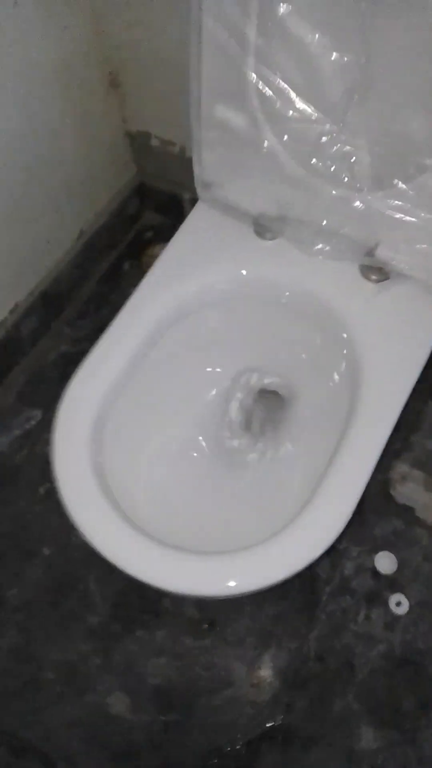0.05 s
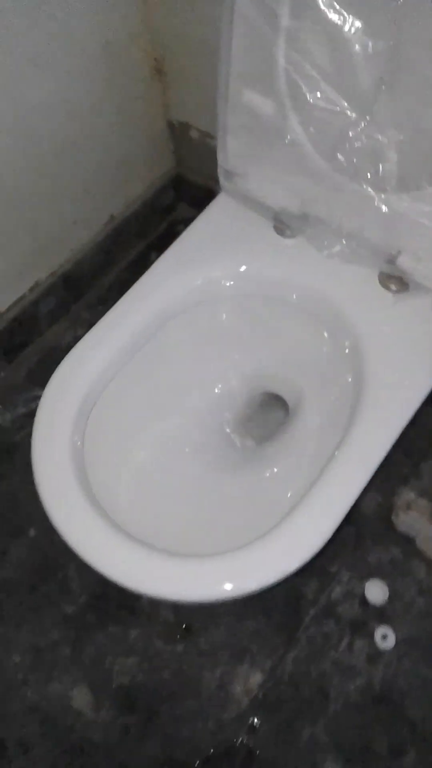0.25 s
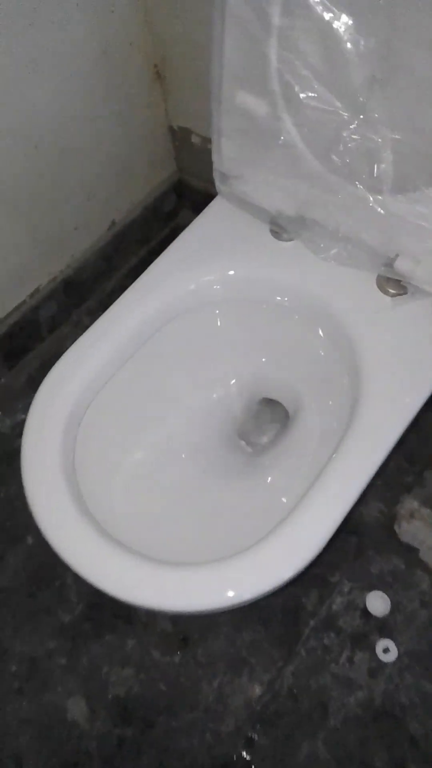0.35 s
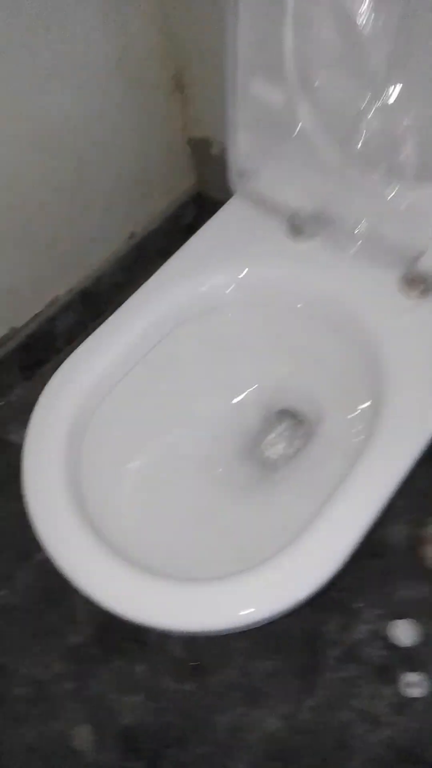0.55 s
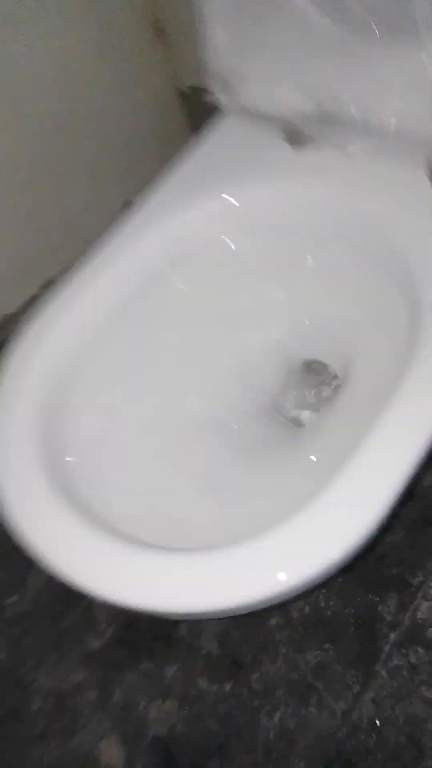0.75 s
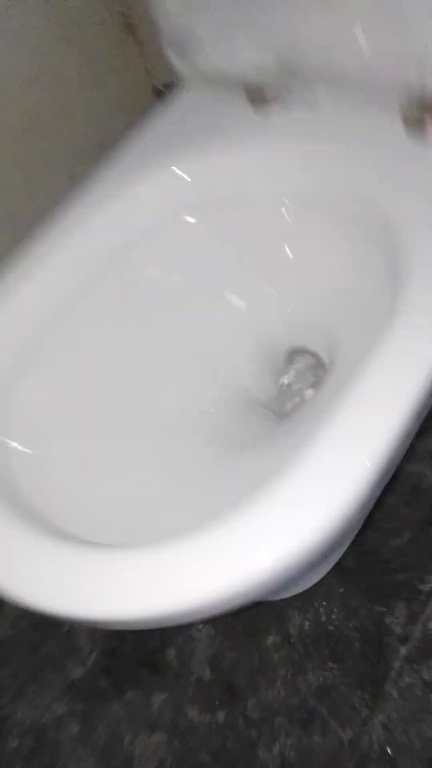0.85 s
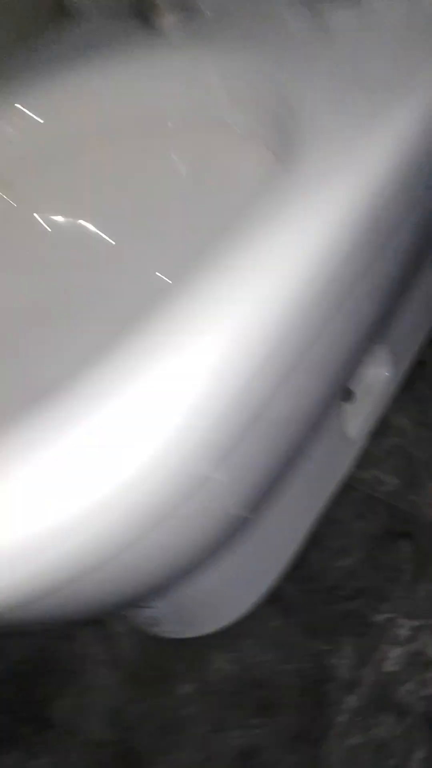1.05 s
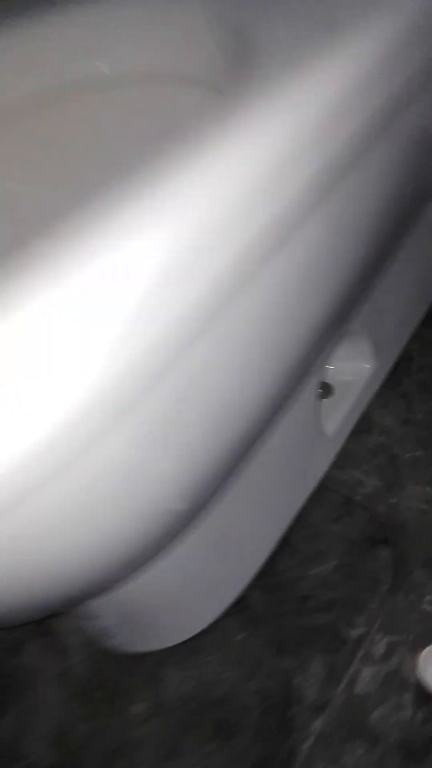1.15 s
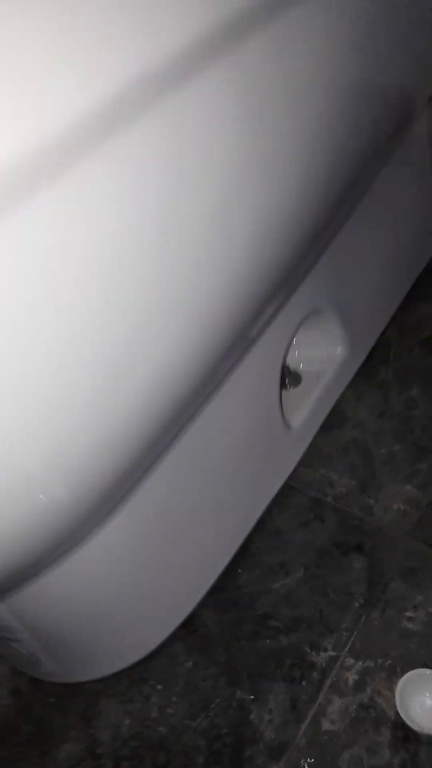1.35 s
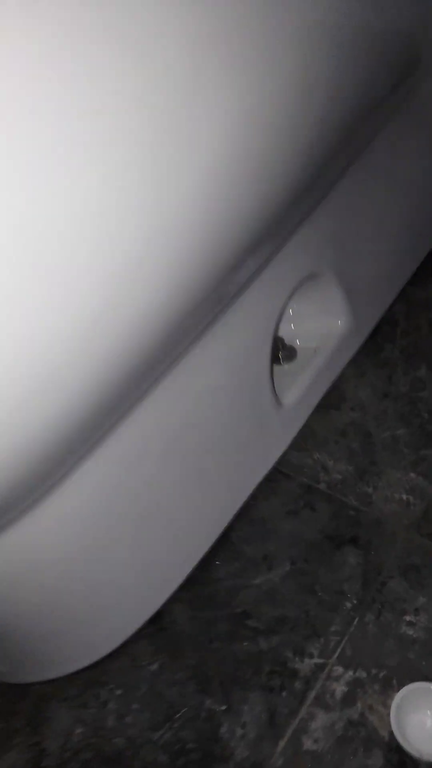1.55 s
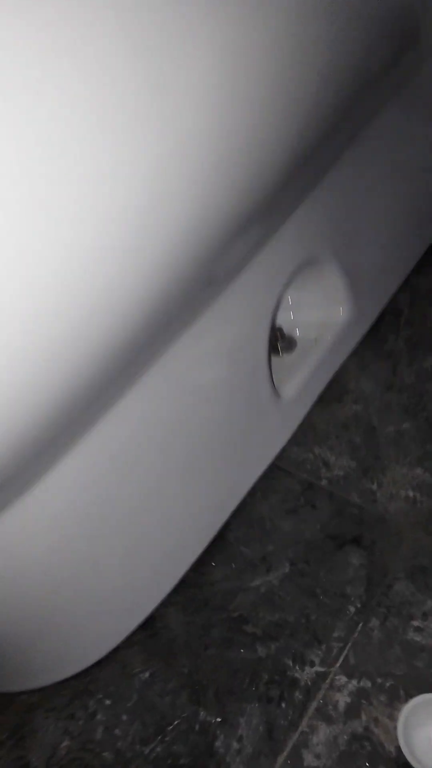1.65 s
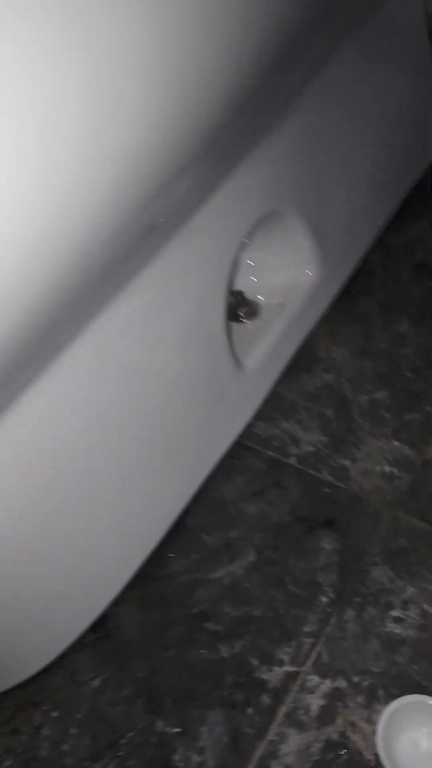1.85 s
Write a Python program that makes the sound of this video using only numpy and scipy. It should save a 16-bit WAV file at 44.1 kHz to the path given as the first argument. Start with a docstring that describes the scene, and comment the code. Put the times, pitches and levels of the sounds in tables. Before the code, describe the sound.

Close handheld microphone in a small echoing bathroom: the tail of a water surge, a loud bucket clatter with scrape, ringing decay, sparse quiet ticks, a soft shoe scuff, and a dull footfall near the end.

```python
"""Water sloshes in a ceramic toilet bowl in a small tiled room: grains of noise coloured by the bowl.
A hard hollow knock, probably the bucket set down, is clatter over decaying modes; its rim scrapes.
Water trickles as sparse grains through resonances, and drips and ticks are short noise strikes.
Clothing rustles close by in bright grains; a shoe slides with a rising hollow note, and steps ring.
Decaying reflections make the room, over a low background noise."""
import sys
import numpy as np
from scipy import signal
from scipy.io import wavfile

SR = 44100
rng = np.random.default_rng(int(sys.argv[2]) if len(sys.argv) > 2 else 0)


def waveform_to_disk(signal):
    """Save audio, clipped to [-1, 1], as 16-bit WAV at the path in sys.argv[1]."""
    frames = np.transpose(np.atleast_2d(signal))
    scaled = np.clip(frames, -1, 1) * 32767
    samples = np.round(scaled).astype(np.int16)
    wavfile.write(sys.argv[1], SR, samples)


N = 83790
T = np.arange(N) / SR  # time in seconds


# Surges of water in the bowl. Each row: start, rise, hold and fall to -60 dB in seconds, level in dB.
SLOSHES = [(0.0, .03, 0.035, .1, -54.5), (.046, 0.041, .02, 0.16, -32)]
# Spectrum of the hollow bowl. Each row: frequency in Hz, relative density in dB per Hz.
SLOSH_SPECTRUM = [(60, -41), (160, -30.5), (205, -9.5), (310, -10.5), (420, -5), (560, -21.5), (700, -13.5),
                  (900, -0.5), (1400, 2), (1800, -9), (2400, -7), (2900, -26), (3500, -25), (5700, -39.5),
                  (15000, -51)]


def slosh():
    """Superposition: many droplet impacts, filtered by the bowl, merge into a surge."""
    return in_room(grain_bursts(SLOSHES, 2500, SLOSH_SPECTRUM), wet_db=-4.5)


# Flow of water down the glaze. Each row: time in seconds, level in dB.
TRICKLE_LEVEL = [(0, -59.5), (.2, -63.5), (.55, -62), (.73, -54), (.82, -60.5), (.92, -62), (1.05, -64),
                 (1.13, -67.5), (1.25, -66.5), (1.6, -67), (1.72, -79.5), (1.9, -76)]
# Spectrum of the trickle. Each row: frequency in Hz, relative density in dB per Hz.
TRICKLE_SPECTRUM = [(300, -10), (800, -7), (1400, -1), (2200, -4), (3700, -5), (6000, -7), (8000, -3),
                    (11000, 4), (15500, -8)]
# Small air pockets that the trickle excites. Each row: frequency in Hz, width in Hz, gain in dB.
AIR_POCKETS = [(2850, 150, -17.5), (4555, 160, -18.5)]


def trickle():
    """Forced resonance: sparse droplet impacts excite small air pockets."""
    drops = grains(1300) * level(TRICKLE_LEVEL)
    return colour(drops, TRICKLE_SPECTRUM) + resonant(drops, AIR_POCKETS)


def water():
    """Superposition: the slosh and the thin trickle add, each with its own room sound."""
    flow = trickle()
    return slosh() + in_room(flow, wet_db=-6.5)


# Blows of the bucket. Each row: time in seconds, clatter level in dB,
# clatter fall to -60 dB in seconds, ring level in dB.
KNOCKS = [(.221, -13.5, 0.049, -21), (0.224, -10.5, 0.0387, -43), (.237, -19, .04, -50),
          (.284, -22.5, 0.1513, -42), (.38, -26, 0.0534, -38.5), (.509, -34.5, 0.0555, -49.5)]
# Spectrum of the clatter. Each row: frequency in Hz, relative density in dB per Hz.
KNOCK_SPECTRUM = [(40, -38.5), (150, -35.5), (200, -9.5), (255, -13.5), (310, -4.5), (370, -3.5), (445, -2),
                  (520, -12), (700, -12.5), (860, 3), (1020, -4.5), (1400, -2), (1800, -6.5), (2400, -6),
                  (2950, -23), (6000, -30.5), (10000, -28), (15000, -42)]
# Modes of bucket and room together. Each row: frequency in Hz, relative level in dB, T60 in seconds.
BUCKET_MODES = [(209.4, -12.5, .9), (304.4, -8, 0.92), (415.4, -6.5, .85), (435.5, -2, 1.12),
                (787, -13, .9), (868, -4, .7), (925, -7, .68), (918, -9, .48), (1150, -8, .45),
                (1317, -9, .48), (1333, -7.5, .45), (1460, -9.5, .47), (1665, -8, .36), (2235, -8, 0.3)]


def bucket_knock():
    """Impact excitation: each blow is a short noise clatter that sets decaying modes ringing."""
    blows = sum(burst(start, 0.0009, 0.0016, fall, db) for start, db, fall, _ in KNOCKS)
    ring = sum(ringing(start, ring_db, BUCKET_MODES) for start, _, _, ring_db in KNOCKS)
    clatter = colour(blows * rng.choice([-1., 1.], N), KNOCK_SPECTRUM)
    return in_room(clatter, wet_db=-1.4) + ring  # the modes already include the room


# Scrapes of the rim. Each row: start, rise, hold and fall to -60 dB in seconds, level in dB.
SCRAPES = [(.378, 0.00056, 0.01, 0.096, -20.5)]
# Spectrum of the scrape. Each row: frequency in Hz, relative density in dB per Hz.
SCRAPE_SPECTRUM = [(200, -13), (800, 5.5), (1500, 2), (2800, -0.5), (4200, -1), (6500, -10), (10000, -7),
                   (15000, -26.5)]


def rim_scrape():
    """Dry friction: the bucket's rim scrapes as a dense train of tiny impacts."""
    return in_room(grain_bursts(SCRAPES, 9000, SCRAPE_SPECTRUM), wet_db=-12.5)


# Drips and small ticks. Each row: time in seconds, level in dB.
TICKS = [(.082, -44), (.572, -59), (0.659, -43.5), (.729, -46), (0.906, -47.5), (0.9751, -41.5),
         (.985, -47), (1.176, -46.5), (1.358, -41), (1.777, -42), (1.892, -50)]
# Spectrum of a tick. Each row: frequency in Hz, relative density in dB per Hz.
TICK_SPECTRUM = [(200, -14), (700, -7), (2200, -2), (4500, -5.5), (7000, -7), (10500, 5), (15500, -4.5)]


def drips_and_ticks():
    """Transient excitation: each strike is a very short burst of broadband noise."""
    strikes = sum(burst(start, .0003, 0.00038, 0.021, db) for start, db in TICKS)
    return in_room(colour(strikes * rng.standard_normal(N), TICK_SPECTRUM), wet_db=-4.5)


# Crisp close rustles. Each row: start, rise, hold and fall to -60 dB in seconds, level in dB.
RUSTLES = [(.082, 0.0014, .003, .14, -52), (.22, 0.00079, 0.0029, 0.016, -23),
           (.278, 0.0086, .027, 0.061, -23.5), (.381, .014, 0.0099, .02, -21), (.41, 0.02, .022, .02, -30),
           (.45, .01, 0.017, .18, -50), (.585, .002, .008, .015, -44), (.99, 0.044, 0.022, .05, -54),
           (1.355, 0.0024, 0.0072, .03, -42), (1.792, .005, .022, 0.21, -44)]
# Spectrum of the cloth. Each row: frequency in Hz, relative density in dB per Hz.
RUSTLE_SPECTRUM = [(300, -39), (3000, -17), (6500, -12.5), (8500, -6), (10500, 0), (13000, -2),
                   (15500, -9.5)]


def clothing():
    """Fibre friction: tiny slips of cloth sum to fine bright noise with little room sound."""
    return in_room(grain_bursts(RUSTLES, 6000, RUSTLE_SPECTRUM), wet_db=-10.5)


# Slide of a shoe over the tiles. Each row: time in seconds, level in dB.
SLIDE_LEVEL = [(1.2, -73), (1.28, -57), (1.345, -54), (1.38, -48.5), (1.425, -42), (1.485, -50),
               (1.52, -42), (1.59, -50.5), (1.62, -63), (1.7, -84)]
# Spectrum of the grit. Each row: frequency in Hz, relative density in dB per Hz.
SLIDE_SPECTRUM = [(470, -22), (800, -19), (1150, -11), (1650, -11.5), (2900, -3), (3750, -6), (4600, -2.5),
                  (6400, -8), (8200, -3.5), (9500, 0.5), (11200, 0.5), (12400, -6), (13100, -3.5),
                  (15500, -9)]
# Resonances of the sliding sole. Each row: frequency in Hz, width in Hz, gain in dB.
SOLE_MODES = [(1870, 47, -18.5), (2200, 54, -19.5), (2930, 110, -15.5), (3460, 80, -17), (4190, 91, -18.5),
              (7270, 130, -18), (9490, 120, -16), (10510, 160, -17.5)]
# The slide's rising hollow note. Each row: time in seconds, centre frequency in Hz, level in dB.
HOLLOW_NOTE = [(1.22, 755, -73), (1.28, 950, -61), (1.315, 1230, -55.5), (1.35, 1400, -61.5),
               (1.425, 1640, -54), (1.5, 1900, -72)]


def shoe_slide():
    """Friction-driven resonance: gritty slips excite the sole and a moving noise band."""
    time, hz, db = np.transpose(HOLLOW_NOTE)
    # Shift the centre frequency down to zero, low-pass with a double pole, and shift back.
    carrier = np.exp(2j * np.pi * np.cumsum(np.interp(T, time, hz)) / SR)
    pole = np.exp(-np.pi * 730 / SR)  # width of one pole: 730 Hz
    band = signal.lfilter([1], np.poly([pole, pole]), grains(2700) / carrier)
    note = evened((carrier * band).real) * amp(np.interp(T, time, db))
    slips = grains(2700) * level(SLIDE_LEVEL)
    grit = colour(slips, SLIDE_SPECTRUM) + resonant(slips, SOLE_MODES)
    slide = (grit + note * (T < time[-1])) * (T > time[0])
    return in_room(slide, wet_db=-12.5)


# Dull footfalls and bumps. Each row: start, rise, hold and fall to -60 dB in seconds, level in dB.
STEPS = [(0.859, 0.021, .02, 0.059, -58.5), (0.972, 0.0031, 0.0062, .03, -64),
         (1.356, 0.0034, 0.01, 0.026, -42), (1.39, 0.012, 0.02, 0.36, -47.5),
         (1.716, .003, 0.0035, 0.025, -56), (1.772, 0.0025, 0.011, 0.086, -40.5),
         (1.799, 0.0029, .014, 0.15, -34.5)]
# Spectrum of a footfall. Each row: frequency in Hz, relative density in dB per Hz.
STEP_SPECTRUM = [(60, -24.5), (160, -21), (210, -6.5), (285, 1), (460, -0.5), (620, -7.5), (900, -20),
                 (1200, -28), (1600, -22.5), (3000, -29), (6000, -33), (11000, -35), (15500, -43)]
# What a footfall rings with. Each row: frequency in Hz, relative level in dB, T60 in seconds.
STEP_MODES = [(212, -17.5, 1), (293.5, -9.5, 1.0), (378, -14, .6), (455.6, -5.5, 0.45), (643, -14, 0.3),
              (750, -19, .28)]


def footfalls():
    """Impact excitation: dull contact noise sets low modes ringing."""
    contact = in_room(grain_bursts(STEPS, 5000, STEP_SPECTRUM), wet_db=-4.5)
    ring = sum(ringing(start, db - 4, STEP_MODES) for start, _, _, _, db in STEPS)
    return contact + ring


# Spectrum of the background. Each row: frequency in Hz, relative density in dB per Hz.
BACKGROUND_SPECTRUM = [(25, -6), (60, -5), (130, -2), (165, -14.5), (210, 4.5), (290, 11), (440, 2.5),
                       (600, -8), (1400, -8), (3000, -20), (8000, -24), (15500, -27)]


def background():
    """Stationary noise: Gaussian noise, filtered mostly to the low range, stays at one level."""
    return amp(-65) * colour(rng.standard_normal(N), BACKGROUND_SPECTRUM)


# Reverberation of the tiled room. Each row: frequency in Hz, T60 in seconds.
ROOM_T60 = [(100, 1.8), (220, 1.2), (330, 1.23), (450, 1.15), (600, 0.72), (900, 0.72), (1500, 0.6),
            (2500, 0.44), (5000, 0.44), (11000, .32), (16000, .2)]
# First reflections from porcelain and the nearest tiles. Each row: delay in seconds, linear gain.
ECHOES = [(.0017, -0.008), (.0031, -0.029), (.0053, -0.02)]


def in_room(x, wet_db):
    """Reverberation: a few close echoes, then dense reflections that die faster in the treble."""
    near = x.copy()
    for delay, gain in ECHOES:
        near += gain * np.pad(x, (round(delay * SR), 0))[:N]
    near /= np.sqrt(1 + sum(gain ** 2 for _, gain in ECHOES))
    reflections = rng.choice([-1., 1.], SR) * (rng.random(SR) < .15)
    hz, t, bands = signal.stft(reflections, SR, nperseg=256)
    decay = np.exp(-np.log(1000) * t / read(ROOM_T60, hz)[:, None])
    tail = signal.istft(bands * decay, SR, nperseg=256)[1]
    tail *= np.arange(len(tail)) / SR > .005  # the tail starts after 5 ms
    return near + amp(wet_db) * signal.fftconvolve(near, tail / np.linalg.norm(tail))[:N]


def ringing(start, db, modes):
    """Modal decay: one blow starts sines of random phase that die exponentially."""
    t = np.maximum(T - start, 0)
    tones = np.zeros(N)
    for hz, mode_db, t60 in modes:
        decay = amp(mode_db) * np.exp(-np.log(1000) * t / t60)
        tones += decay * np.sin(2 * np.pi * (hz * t + rng.random()))
    return amp(db) * np.minimum(t / .008, 1) * tones  # 8 ms rise


def resonant(x, modes):
    """Forced resonance: narrow fixed peaks, each scaled to about unit energy before its gain."""
    total = np.zeros(N)
    for hz, width, db in modes:
        peak = signal.lfilter(*signal.iirpeak(hz, hz / width, SR), x)
        total += amp(db) * np.sqrt(SR / np.pi / width) * peak
    return total


def grain_bursts(rows, per_s, spectrum):
    """Source and filter: bursts of tiny impacts excite one body."""
    envelope = sum(burst(*row) for row in rows)
    return colour(grains(per_s) * envelope, spectrum)


def grains(per_s):
    """Shot noise: tiny impacts of unequal size and random sign at random times, rms 1."""
    size = amp(2.5 * np.minimum(rng.exponential(1, N), 4))  # spread over 0 to 10 dB
    sign = rng.choice([-1., 1.], N)
    struck = rng.random(N) < per_s / SR
    return evened(size * sign * struck)


def burst(start, rise, hold, fall, db):
    """Exponential decay: a linear rise and a hold, then a fall by 60 dB per fall time."""
    t = T - start
    decay = np.exp(-np.log(1000) * np.maximum(t - rise - hold, 0) / fall)
    return np.clip(t / rise, 0, 1) * amp(db) * decay


def colour(x, points, size=4096):
    """Minimum-phase filtering: a causal response of unit energy with the given spectrum."""
    hz = abs(np.fft.fftfreq(size, 1 / SR))
    log_gain = np.log(amp(np.maximum(read(points, hz), -100)))
    taps = np.fft.ifft(np.exp(np.conj(signal.hilbert(log_gain)))).real[:size // 2]
    return signal.fftconvolve(x, taps / np.linalg.norm(taps))[:N]


def read(points, hz):
    """Logarithmic pitch scale: interpolates a table over log frequency."""
    f, value = np.transpose(points)
    return np.interp(np.log(hz + 1), np.log(f + 1), value)


def level(points):
    """Amplitude envelope: gain over time, interpolated in dB."""
    return amp(np.interp(T, *np.transpose(points)))


def evened(x):
    """Power normalisation: scales to rms 1."""
    return x / np.sqrt(np.mean(x ** 2) + 1e-20)


def amp(db):
    """Decibel law: 20 dB is a tenfold amplitude."""
    return 10 ** (np.asarray(db) / 20)


def scene():
    """Superposition: the pressures of all sources and the background add."""
    floor = background()
    wet = water()
    bucket = bucket_knock() + rim_scrape()
    ticks = drips_and_ticks()
    person = clothing() + shoe_slide() + footfalls()
    return (wet + bucket + ticks + person + floor)[None]


def record(dry):
    """Band limiting: a linear-phase low-pass at 15950 Hz sets the recorder's upper edge."""
    taps = signal.firwin(511, 15950, window=("kaiser", 9), fs=SR)
    return signal.oaconvolve(dry, taps[None], "same")


dry = scene()
out = record(dry)
waveform_to_disk(out)
```